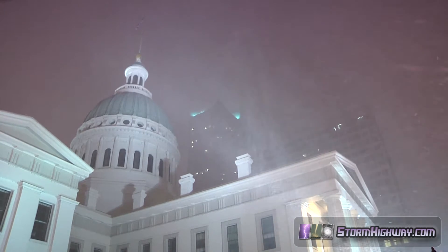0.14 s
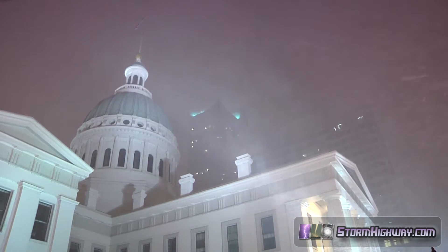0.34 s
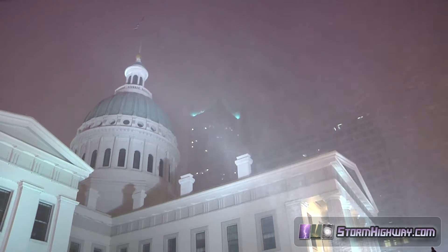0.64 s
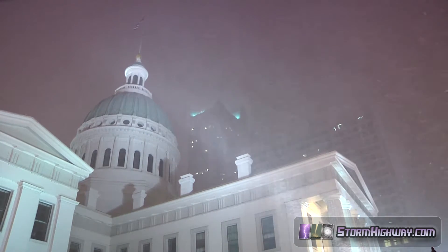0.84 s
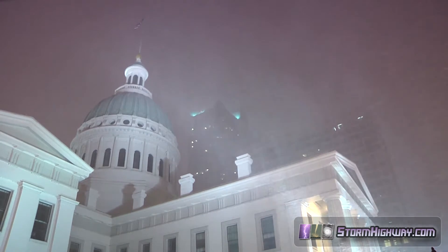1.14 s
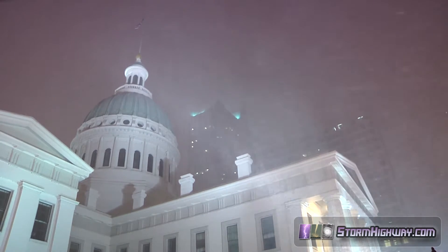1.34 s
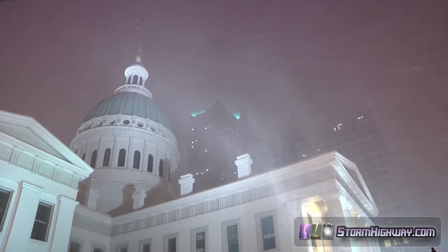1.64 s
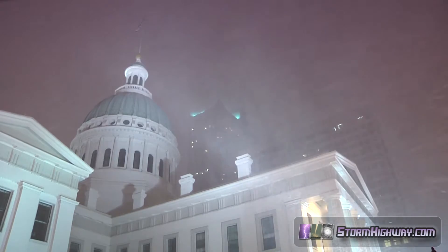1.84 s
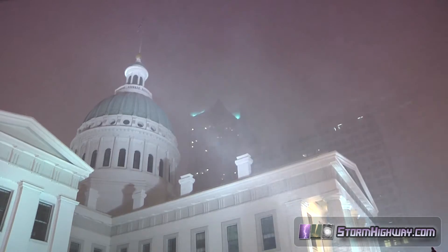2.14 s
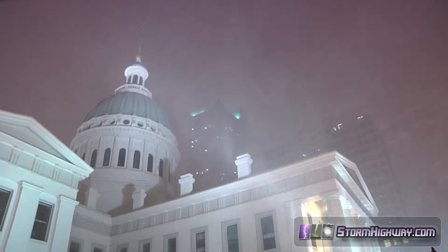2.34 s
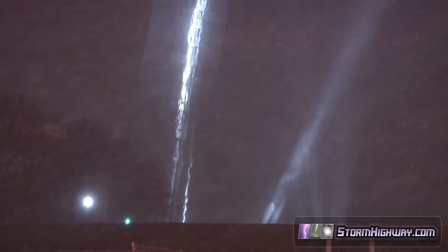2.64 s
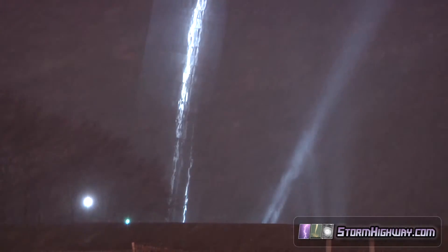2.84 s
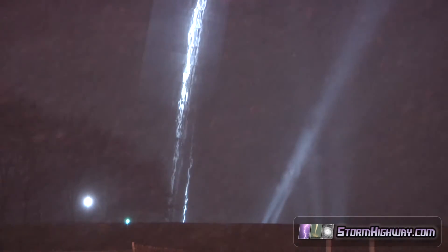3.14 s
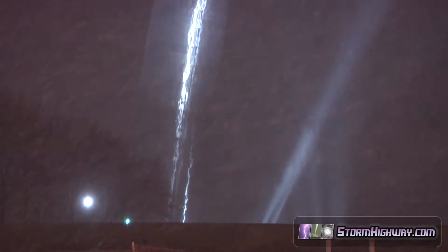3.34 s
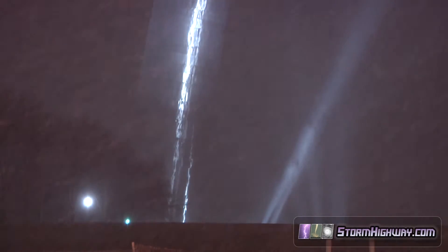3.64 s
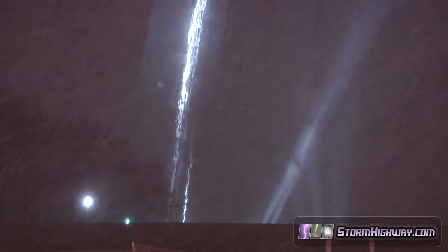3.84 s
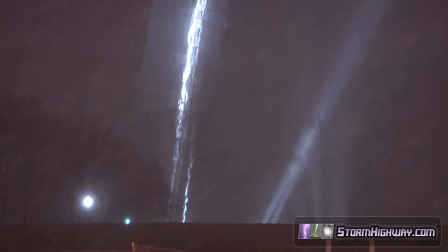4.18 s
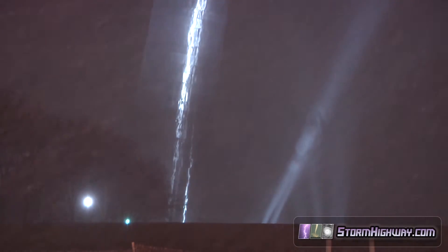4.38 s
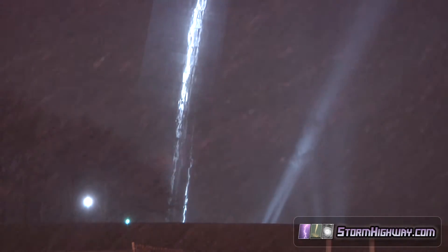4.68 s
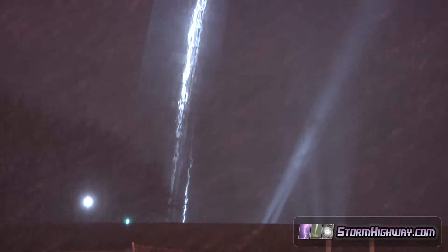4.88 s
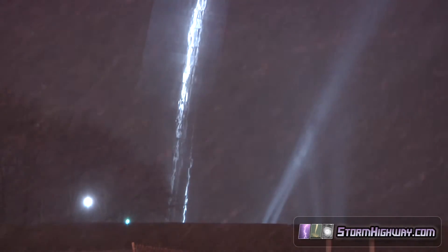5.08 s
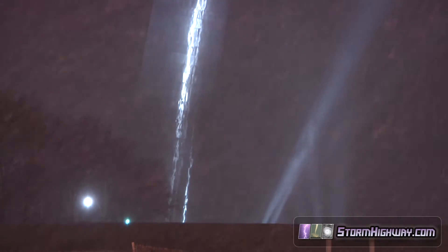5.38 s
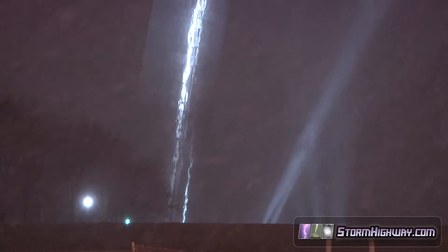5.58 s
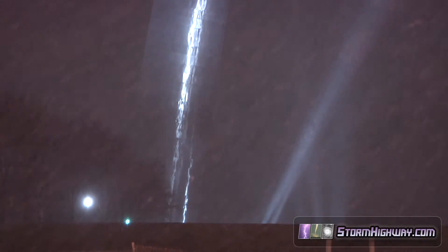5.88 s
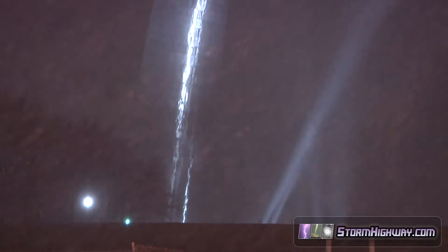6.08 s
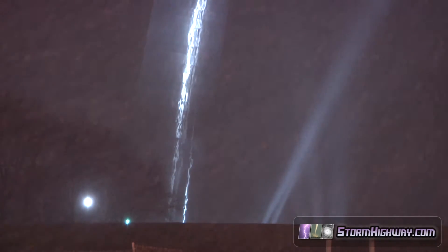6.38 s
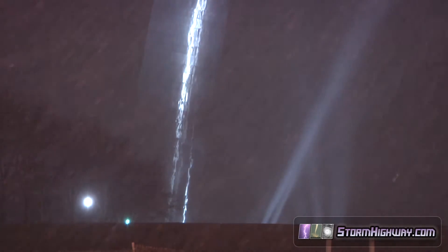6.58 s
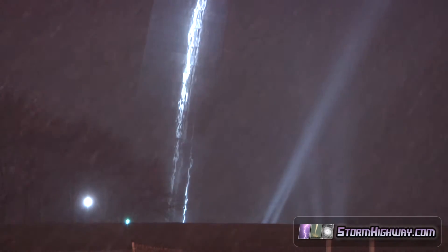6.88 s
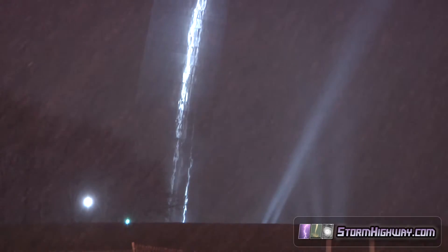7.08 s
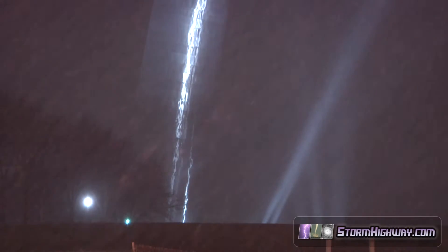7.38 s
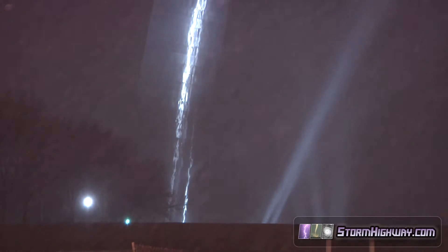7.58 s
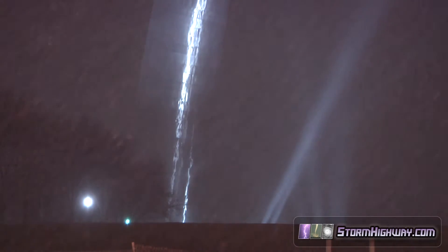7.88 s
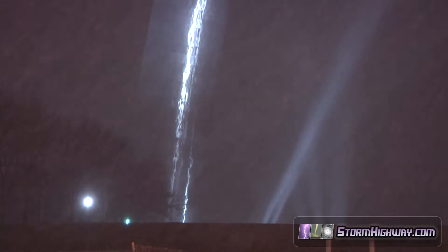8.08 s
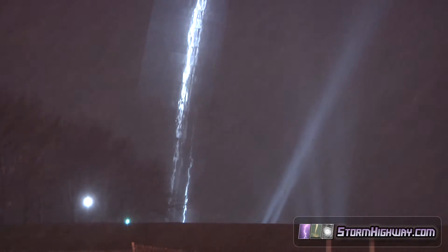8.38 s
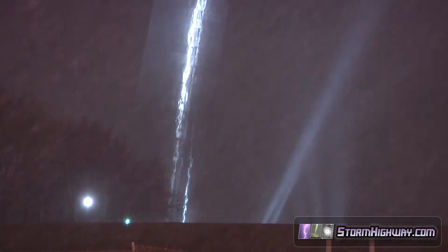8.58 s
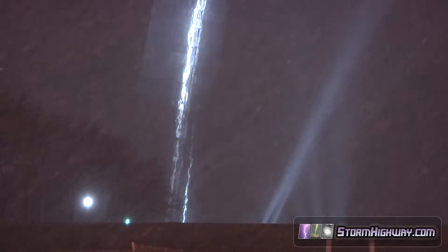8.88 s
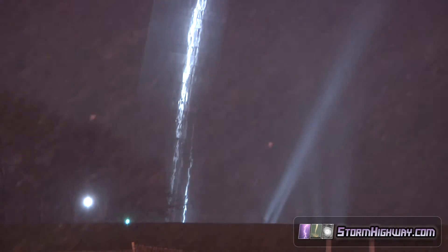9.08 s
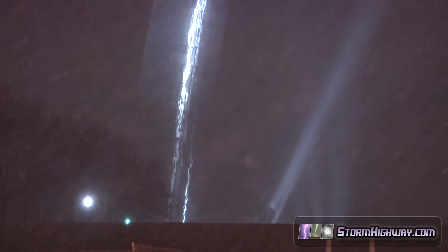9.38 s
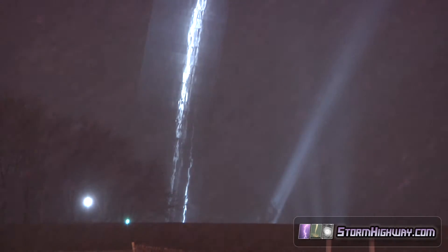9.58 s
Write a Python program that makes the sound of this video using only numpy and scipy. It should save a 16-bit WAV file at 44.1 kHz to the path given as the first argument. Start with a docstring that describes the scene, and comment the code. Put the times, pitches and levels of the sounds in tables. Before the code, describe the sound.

Blustery winter wind rumbles outdoors as dense, bright snow patter thins into scattered crisp ticks over a faint low hum.

```python
"""A snowstorm, first in a courtyard, then from 2.5 s in an open park.
From the start: filtered-noise wind and brief low buffets, a smooth hiss of drifting snow, dense bright
patter of flakes on a camera's shell (noise grains through its resonances), sharp ticks and soft
ringing thuds. From 2.5 s: sparser, duller patter, a sine hum, and ticks and thuds to the end.
The left microphone is the more sensitive."""
import sys
import numpy as np
from scipy import signal
from scipy.fft import rfft, irfft
from scipy.io import wavfile
from scipy.ndimage import uniform_filter1d

SR = 44100
rng = np.random.default_rng(int(sys.argv[2]) if len(sys.argv) > 2 else 0)


def store_wav(level_fs):
    """Save 16-bit WAV to argv[1]."""
    pcm = np.round(np.clip(np.atleast_2d(level_fs), -1, 1) * 32767)
    wavfile.write(sys.argv[1], SR, pcm.T.astype(np.int16))


N = 428652
HZ = np.fft.rfftfreq(1024, 1 / SR)  # bins of one impact
LONG_HZ = np.fft.rfftfreq(N, 1 / SR)  # bins of the whole scene
PARK_FROM_S, EDGE_HZ = 2.5, 16000
SWIRL_DB, SWIRL_HZ = 1.82, 9.9  # uneven swirls within each flurry: rms, top rate

# machinery and mains hum in the park: f/Hz, level/dB
HUM_TONES = [(42, -52), (60, -47.5), (80, -59), (360, -55)]
# wind swells: t/s, low rumble/dB, roar/dB
WIND_LEVELS = [(0, -37, -37), (0.35, -32, -38.5), (0.75, -32, -34.5), (0.95, -32, -39), (1.8, -33, -36),
               (2.13, -33, -39.5), (2.45, -33.5, -37), (2.6, -33.5, -35), (3.4, -34.5, -33.5),
               (4.2, -37, -34), (4.8, -35.5, -33), (5.15, -32, -33.5), (5.6, -32, -33), (5.9, -33.5, -34),
               (6.35, -34.5, -32.5), (6.6, -34, -35.5), (8.4, -36, -36.5), (9.72, -35.5, -38.5)]
# wind spectrum in each place, relative, read up to 1 kHz only: f/Hz, density/dB
WIND_COURTYARD = [(13, -30), (22, -3.5), (48, 3), (91, -3.5), (129, 2.5), (157, -4.5), (248, -3), (412, -8),
                  (454, -9), (553, -11.5), (600, -9), (889, -12), (1100, -19), (1430, -47), (2420, -120)]
WIND_PARK = [(13, -43), (22, -10.5), (49, 1), (102, -3.5), (265, -7), (380, -10), (454, -9.5), (767, -8.5),
             (1100, -19), (1430, -46), (2420, -120)]
# treble of the roar, dulled by air; read at 1.034 times the frequency: f/Hz, gain/dB
ROAR_TREBLE = [(1100, 5), (1400, -4), (1800, -13), (2300, -13.5), (3000, -23), (5000, -34), (16000, -50)]
# eddies at the microphones: t/s, level/dB, length/s (centre to 1/e), f/Hz
EDDIES = [(0.42, -29.5, 0.055, 124), (1.51, -34, 0.023, 70), (2, -27, 0.022, 70),
          (2.243, -28.5, 0.022, 150), (2.474, -32.5, 0.036, 121), (5.592, -28.5, 0.094, 118),
          (6.49, -31, 0.059, 90)]
# soft clumps: t/s, peak/dB before the lift and the side gains, f/Hz, t60/s
CLUMPS = [(0.4995, -19, 790, 0.007), (1.140, -25.5, 110, 0.054), (1.5456, -12, 766, 0.0059),
          (1.584, -23, 655, 0.012), (1.9591, -17.5, 285, 0.048), (1.971, -21, 130, 0.031),
          (3.3885, -16.5, 640, 0.012), (3.3975, -16.5, 590, 0.018), (6.8458, -15, 800, 0.0056),
          (7.251, -19.5, 410, 0.0085), (8.634, -21, 573, 0.025), (9.142, -22.5, 540, 0.034)]
# flurries: t/s, level of the fine patter/dB before the swirls
FLURRY_LEVELS = [(0, -42.5), (0.15, -48), (0.28, -40), (0.78, -39.5), (0.9, -44.5), (1.8, -41), (1.97, -45),
                 (2.1, -56.5), (2.35, -47), (2.58, -42.5), (3.48, -44), (3.7, -53), (4.12, -46.5),
                 (4.3, -50), (4.8, -51.5), (4.96, -45.5), (5.12, -53.5), (5.59, -55), (5.75, -39.5),
                 (5.92, -46.5), (6.08, -46), (6.3, -39.5), (6.55, -47.5), (6.92, -42), (7.2, -44),
                 (7.62, -40), (7.75, -55), (7.97, -44.5), (8.2, -49.5), (8.48, -43), (8.85, -49.5),
                 (9.15, -45), (9.3, -50), (9.72, -51.5)]
# the shell's response to a flake: f/Hz, gain/dB
SHELL_RESPONSE = [(100, -33), (500, 3), (1400, 0), (2300, 1), (3000, -4), (4400, -8.5), (7000, -8),
                  (10000, -13.5), (20000, -21)]
# resonances on top of it: f/Hz, width/Hz, gain/dB
SHELL_MODES = [(3500, 600, 3), (5845, 860, 5.9), (8900, 510, 4.1)]
# left-right likeness of impacts: f/Hz, correlation (1 = same)
IMPACT_LIKENESS = [(300, 0.26), (900, 1), (1500, 0.56), (3100, 0.29), (6800, -0.025), (15000, -0.82)]
# tone of the fine patter in each place: f/Hz, gain/dB
PATTER_TONE_COURTYARD = [(300, 5), (1400, 3), (2200, -3), (3600, 6), (5800, 1.5), (7500, 5), (10000, 11),
                         (13000, 8.5), (16000, 7)]
PATTER_TONE_PARK = [(300, -26), (1000, -9), (2200, -5), (3600, -3.5), (5800, -2), (9000, 1.5), (15000, 3.5)]
# side of the patter, before each grain's random offset: f/Hz, left minus right/dB
PATTER_LEAN = [(700, 1), (1300, 5.5), (2400, 6.5), (4400, 2.5), (8100, 8.5), (15000, 7.5)]
# hardest flakes: t/s, level/dB, brightness/dB and low knock/dB (both before scaling and offset),
# left minus right/dB (in the treble), ring f/Hz
HARD_FLAKES = [(0.2661, -23.5, -9, -5, -1, 3430), (0.3259, -29, -4, 4, 6, 5900),
               (0.3869, -26.5, 6, 2, 8, 1600), (0.4985, -30, 17, 6, -2, 2200),
               (0.9715, -22.5, -9, -8, 9, 5800), (1.1411, -23.5, 8, 8, 7, 9500),
               (1.3818, -25, 0, -15, 3, 9800), (1.5838, -37, -7, -5, -2, 2420),
               (1.6564, -31, -5, 13, 6, 2200), (1.6616, -24, -3, 2.5, 5, 9900),
               (1.6912, -24, 3, 8.5, 3, 8000), (1.8178, -27.5, 4, -4, -1, 3740),
               (1.9784, -27, -6, 5, 5, 6300), (2.5415, -25, 20, 2, 9, 7200), (2.5573, -22, 7, 3, 12, 2630),
               (2.5834, -24, 14, 6, 1.5, 1980), (2.814, -24.5, 4, -4, 0, 1600),
               (2.8872, -23.5, 8, 10.5, 11, 5860), (3.015, -21.5, -1, -1, 1, 5900),
               (3.1264, -24, 10, -9, 1, 2400), (3.1447, -25.5, 6, -12.5, 5, 8900),
               (3.2319, -28, 14, -7, 2, 2000), (3.358, -22.5, 5, 6.5, 3, 2200),
               (3.3972, -24, 7.5, -6.5, 0.5, 2000), (3.4054, -17, 7, -1, 5, 5670),
               (3.502, -26.5, -3, 3, 4.5, 1980), (3.699, -23, -3, -5, 11, 3840),
               (3.742, -28, 3.5, 7, 4, 1900), (3.7733, -27.5, -16.5, -13, 11, 2530),
               (3.8507, -31, 0, -8, 7, 2200), (4.1639, -28.5, 1, -3.5, 3, 6000),
               (4.9396, -30.5, 8, -1, 3, 5770), (4.9766, -21, -3, -10, 4, 3200),
               (5.2858, -28.5, 2, -4, 7, 6760), (5.401, -23, 11, -4, 3, 1600),
               (5.6654, -22.5, -7.5, -25, 13, 6070), (5.7014, -24.5, 11, 2, 5, 7500),
               (5.731, -23, -5, -6, 6, 5900), (5.7443, -25.5, -2, -3, 16, 2700),
               (5.7606, -18.5, 4, -17, -1, 5770), (5.9473, -22.5, -4, 5, 16, 2840),
               (6.0266, -20.5, -1, 5, 7, 2120), (6.1225, -22, 1, -5, 5, 5100),
               (6.1723, -21.5, -14, -2, 14, 2500), (6.2787, -22.5, 1, -8, 11, 2410),
               (6.3599, -26, 3, 12, 2, 2200), (6.3797, -22.5, -4, 8.5, 12, 2700),
               (6.5246, -21, -7, -3, 2, 2500), (6.567, -22, 0, -3, 9, 1700), (6.696, -14, 0, -5.5, 0, 1950),
               (6.7342, -21.5, -1, 0, 12, 2320), (6.846, -24, 21, -6, 6, 5800),
               (6.886, -27, 11, 7, 12, 2580), (6.9307, -23.5, 24, 14, 10, 7100),
               (7.0401, -21, 4, 2, 16, 4840), (7.2077, -21, -2, -10, 3, 2100),
               (7.2509, -19.5, -8, -1, 6, 2640), (7.3289, -26.5, 9, 14, 7, 6030),
               (7.3642, -21.5, -25, 5.5, 12, 1980), (7.497, -25.5, 8, -7, 7, 3600),
               (7.5487, -20, 16, 7, 8, 7440), (7.6098, -17.5, 7, 1, 2, 5700),
               (7.9008, -18.5, 2, -10, 1, 5950), (8.0028, -24.5, 0, 5, 1, 4750),
               (8.3067, -25.5, 5, 6, 10, 7640), (8.3501, -18.5, 11, 0.5, 9, 7400),
               (8.3948, -21.5, 5, 6, 2, 2200), (8.4366, -27, -17, -9, 10, 2260),
               (8.4869, -29.5, -1, 9, 4, 7500), (8.6356, -25, 3, 7, 9, 6100),
               (9.1423, -26.5, 17, -1, 6, 4900), (9.1926, -30, -9, 1, 3, 5870),
               (9.386, -23, 4, -10, 12, 2900), (9.417, -25.5, 16, -1, 13, 5600)]


def gain_of(db):
    """Decibels to amplitude."""
    return 10 ** (np.asarray(db) / 20)


def evened(x):
    """Scales to rms 1."""
    return x / np.sqrt(np.mean(x ** 2) + 1e-20)


def read(points, hz=HZ):
    """Reads a table on a log-frequency axis."""
    f, value = np.transpose(points)
    return np.interp(np.log(hz + 1), np.log(f + 1), value)


def curve(rows, axis=1):
    """One column of a time table, sample by sample."""
    rows = np.asarray(rows)
    return np.interp(np.arange(N) / SR, rows[:, 0], rows[:, axis])


def sides(db):
    """Left and right gains of mean power 1 for a level difference."""
    pair = gain_of(np.array([[0.5], [-0.5]]) * db)
    return pair / np.sqrt(np.mean(pair ** 2, 0))


def add(mix, s, sound):
    """Mixes a stereo sound in at a time."""
    start = max(round(s * SR), 0)
    part = mix[:, start:][:, :sound.shape[1]]
    part += sound[:, :part.shape[1]]


def causal(db):
    """The minimum-phase filter of this gain, by folding the cepstrum."""
    cepstrum = irfft(np.log(gain_of(db)))
    half = cepstrum.shape[-1] // 2
    cepstrum[..., 1:half] *= 2
    cepstrum[..., half + 1:] = 0
    return np.exp(rfft(cepstrum))


def in_park():
    """0 in the courtyard, 1 in the park, with a 10 ms crossfade."""
    return np.clip((np.arange(N) / SR - PARK_FROM_S) * 100 + 0.5, 0, 1)


def hum(waver=0.11):
    """Distant machinery drones as sines whose level and phase waver slowly."""
    t, out = np.arange(N) / SR, np.zeros(N)
    slow = LONG_HZ < 1.5
    for hz, db in HUM_TONES:
        swell, drift = waver * evened(irfft(rfft(rng.standard_normal((2, N))) * slow, N))
        tone = np.sin(2 * np.pi * hz * t + 2 * drift)
        out += gain_of(db) * np.sqrt(2) * (1 + swell) * tone
    return out * in_park() * sides(8)


def hiss(level_db=-60):
    """Snow drifting farther off blends into smooth noise that falls towards the treble."""
    tone = [(500, -1), (3000, -1.5), (4500, -2), (6000, -3.5), (10000, -7.5), (16000, -10)]
    air = rfft(rng.standard_normal((2, N)))
    noise = evened(irfft(air * gain_of(read(tone, LONG_HZ)), N))
    return gain_of(level_db) * sides(2.3) * noise


def wind(split_hz=330, lean_db=8, apart_db=-21, churn_db=1.0):
    """Turbulent rumble and roar swell apart, churn a little, and reach both microphones almost alike."""
    low = 1 / np.sqrt(1 + (LONG_HZ / split_hz) ** 8)
    high = np.sqrt(1 - low ** 2)
    park, out = in_park(), np.zeros((2, N))
    for band, level_db in ((low, curve(WIND_LEVELS)), (high, curve(WIND_LEVELS, axis=2))):
        churn = evened(irfft(rfft(rng.standard_normal(N)) * (LONG_HZ < 14), N))
        swell = gain_of(level_db + churn_db * churn)
        air = rfft(rng.standard_normal((2, N)))
        for place, share in ((WIND_COURTYARD, 1 - park), (WIND_PARK, park)):
            colour_db = read(place, np.minimum(LONG_HZ, 1000)) + read(ROAR_TREBLE, LONG_HZ * 1.034)
            common, apart = evened(irfft(air * band * gain_of(colour_db), N))
            pair = common * sides(lean_db) + gain_of(apart_db) * apart * np.array([[0.5], [-1]])
            out += share * swell * pair
    return out


def buffets(octaves=0.55):
    """An eddy rolls over the microphones: a brief swell of low, narrow noise."""
    t, out = np.arange(N) / SR, np.zeros(N)
    air = rfft(rng.standard_normal(N))
    for s, db, length_s, pitch_hz in EDDIES:
        band = np.exp(-0.5 * (np.log2((LONG_HZ + 1) / pitch_hz) / octaves) ** 2)
        eddy = evened(irfft(air * band, N))
        out += gain_of(db) * np.exp(-((t - s) / length_s) ** 2) * eddy
    return out * sides(9.1)


def thuds(lift_db=2, rise_s=0.0006):
    """A soft clump gives the shell a short, dull, decaying ring."""
    out, t = np.zeros((2, N)), np.arange(SR // 10) / SR
    for s, db, hz, t60_s in CLUMPS:
        envelope = gain_of(-60 * t / t60_s) * (1 - np.exp(-(t / rise_s) ** 2))
        ring = np.sin(2 * np.pi * hz * t) * envelope
        add(out, s, gain_of(db + lift_db) * sides(8) * ring / abs(ring).max())
    return out


def flurry_db():
    """How thickly snow falls on the camera: flurries and the quick swirls within them."""
    swirl = evened(irfft(rfft(rng.standard_normal(N)) * (LONG_HZ < SWIRL_HZ), N))
    return curve(FLURRY_LEVELS) + SWIRL_DB * swirl


def brightness(db):
    """Small hard flakes favour the treble, soft ones the middle."""
    return db * read([(2300, -0.82), (6000, 0.38), (12000, 0.89)])


def spot(hz, db, octaves=0.18):
    """The spot where a flake lands rings in one band of its own."""
    return db * np.exp(-0.5 * (np.log2((HZ + 1) / hz) / octaves) ** 2)


def impact(colour_db, lean_db, crush_s, snap, size=1024):
    """A flake snaps and crumbles within milliseconds; the shell colours it for each microphone."""
    t = np.arange(size) / SR
    crumble = rng.standard_normal((2, size)) * np.exp(-t / crush_s)
    crumble /= np.linalg.norm(crumble, axis=1, keepdims=True)
    crumble[:, 0] += snap * rng.choice([-1, 1], 2)
    a, b = rfft(crumble)
    same = np.clip(read(IMPACT_LIKENESS), -1, 1)
    pair = np.array([a, same * a + np.sqrt(1 - same ** 2) * b])
    modes_db = sum(db / (1 + (2 * (HZ - f) / width) ** 2) for f, width, db in SHELL_MODES)
    shell_db = read(SHELL_RESPONSE) + modes_db
    z = pair * causal(shell_db + colour_db) * sides(lean_db)
    treble = irfft(z * (HZ > 1400))
    return irfft(z) / np.sqrt(np.sum(treble ** 2) / 2)  # treble energy 1 per side


def patter(courtyard_per_s=1400, park_per_s=800, spread_db=6.5, variety_db=5, ring_db=8,
           crush_s=0.0013, snap=0.34, count=36):
    """Many small flakes of uneven size, denser in the courtyard; a flurry brings more and harder ones."""
    level, park, out = gain_of(flurry_db()), in_park(), np.zeros((2, N))
    rate_per_s = (courtyard_per_s * (1 - park) + park_per_s * park) * level / level.mean()
    chance, size, kind = rng.random(N), rng.exponential(1, N), rng.integers(0, count, N)
    hits = (chance < rate_per_s / SR) * gain_of(spread_db * np.minimum(size, 4.5))
    # even out the local power, then impose the flurry level
    hits /= np.sqrt(np.abs(uniform_filter1d(hits ** 2, size=4000)) + 1e-9)
    hits *= level
    rings_hz = rng.permutation(np.geomspace(1500, 15000, count))
    for k, bright in enumerate(np.linspace(-1.5, 1.5, count)):
        own_db = brightness(variety_db * bright) + spot(rings_hz[k], ring_db)
        for tone, share in ((PATTER_TONE_COURTYARD, 1 - park), (PATTER_TONE_PARK, park)):
            lean_db = read(PATTER_LEAN) + 3 * rng.standard_normal()
            grain = impact(read(tone) + own_db, lean_db, crush_s, snap)
            own_hits = hits * share * (kind == k)
            out += signal.oaconvolve(own_hits[None], grain, axes=1)[:, :N]
    return out


def stray_flakes(per_s=13, level_db=-32.5, follow=0.75, spread_db=1.1, courtyard_db=-4.0,
                 bright_db=2, knock_db=-7, lean_db=7, count=300):
    """Middling flakes land at random, more often and harder in a flurry; rows as in HARD_FLAKES."""
    when, chance, ring = rng.random((count, 3)).T
    s = (np.arange(count) + when) / count * (N - 1) / SR
    thick = curve(FLURRY_LEVELS)
    thick_db = thick[(s * SR).astype(int)] - thick.mean()
    size, bright, knock, lean = rng.standard_normal((count, 4)).T
    shelter_db = courtyard_db * (s < PARK_FROM_S)
    flake_db = level_db + follow * thick_db + spread_db * size + shelter_db
    ring_hz = 1900 * (7500 / 1900) ** ring
    rows = np.column_stack([s, flake_db, bright_db + 7 * bright, knock_db + 4 * knock,
                            lean_db + 4 * lean, ring_hz])
    return rows[chance < per_s * N / SR / count * gain_of(thick_db)]


def ticks(crush_s=0.0015, snap=0.38, bright_db=1, knock_db=3, ring_db=7, shard_db=-15):
    """Hard flakes strike the shell, each with its own colour and side; a shard lands a moment later."""
    out = np.zeros((2, N))
    low = read([(900, 1.0), (1600, 0)])
    for s, db, bright, knock, lean, ring_hz in [*HARD_FLAKES, *stray_flakes()]:
        knock_colour_db = low * (knock + knock_db)
        colour_db = brightness(0.4 * bright + bright_db) + knock_colour_db + spot(ring_hz, ring_db)
        lean_db = low * 8 + (1 - low) * lean
        size = gain_of(db) * np.sqrt(0.0018 * SR)  # the level holds for about 2 ms
        add(out, s, size * impact(colour_db, lean_db, crush_s, snap))
        shard = size * gain_of(shard_db) * impact(colour_db, lean_db, crush_s, snap)
        add(out, s + rng.uniform(0.0025, 0.025), shard)
    return out


def scene():
    """Wind all round, snow on the camera."""
    return hum() + hiss() + wind() + buffets() + thuds() + patter() + ticks()


def record(dry):
    """Band limit: a linear-phase low-pass at EDGE_HZ."""
    lowpass = signal.firwin(255, EDGE_HZ, window=("kaiser", 9), fs=SR)
    return signal.oaconvolve(dry, lowpass[None], "same")


dry = scene()
out = record(dry)
store_wav(out)
```